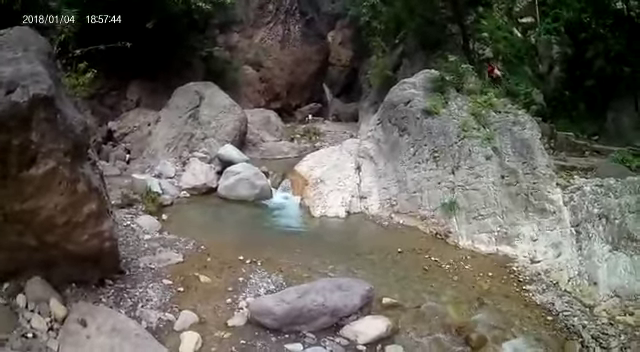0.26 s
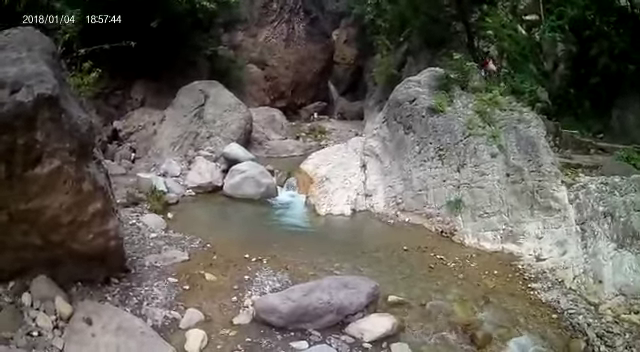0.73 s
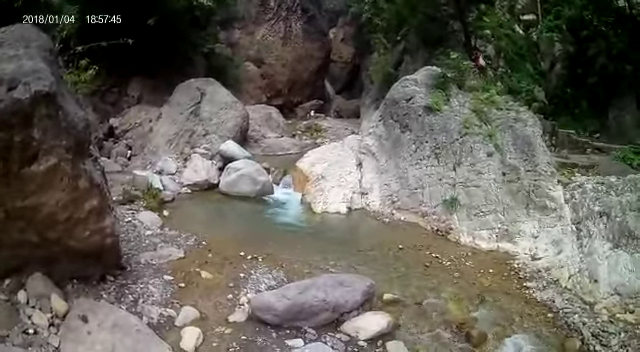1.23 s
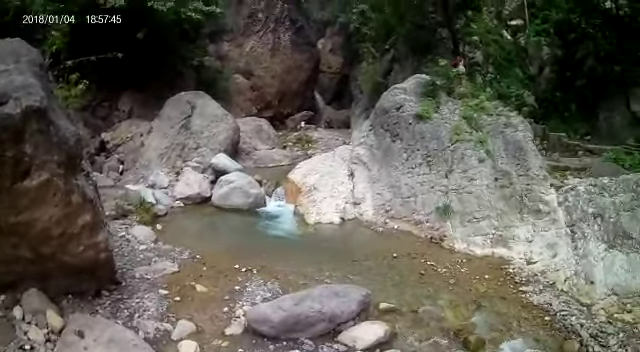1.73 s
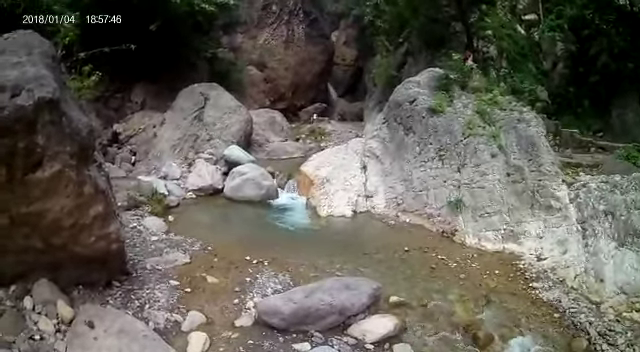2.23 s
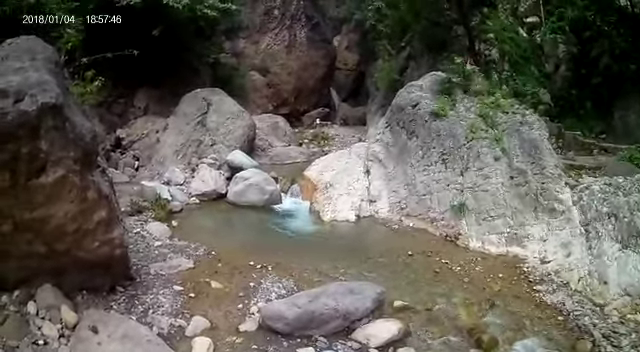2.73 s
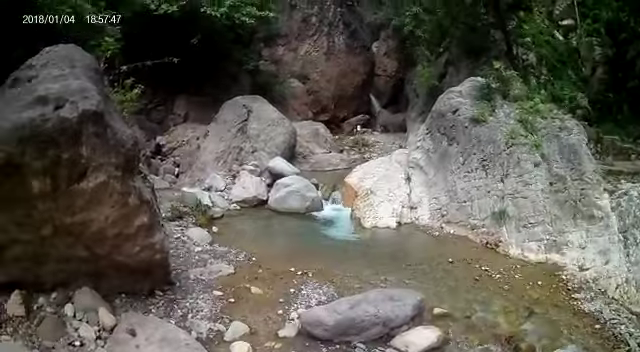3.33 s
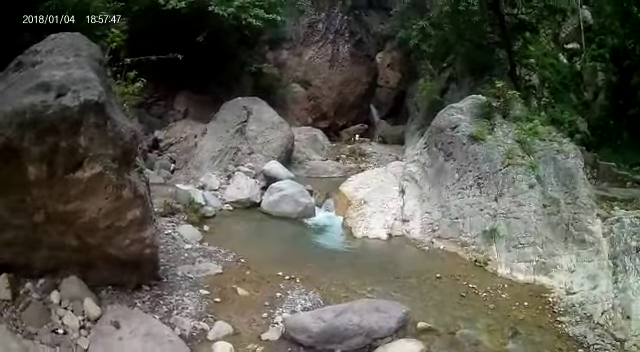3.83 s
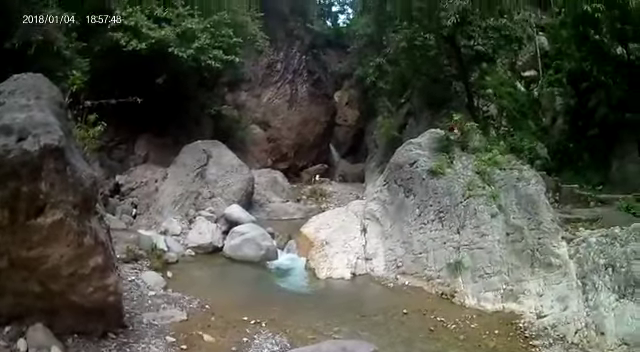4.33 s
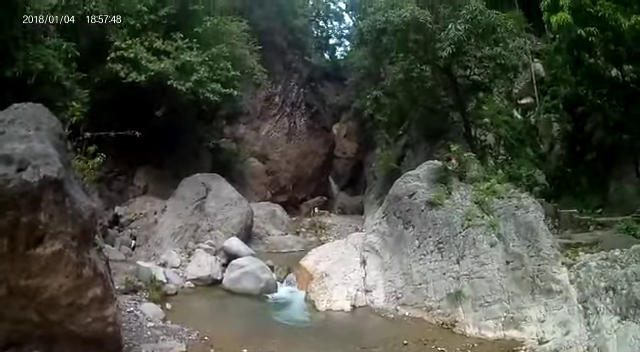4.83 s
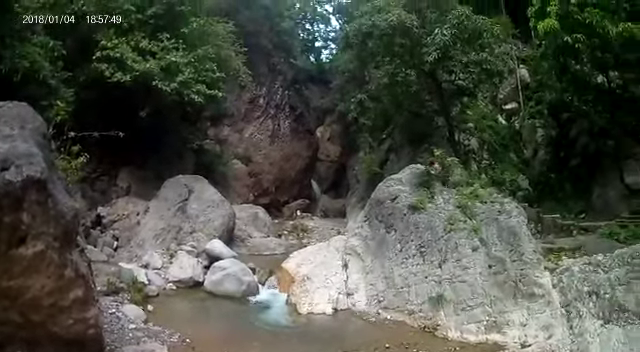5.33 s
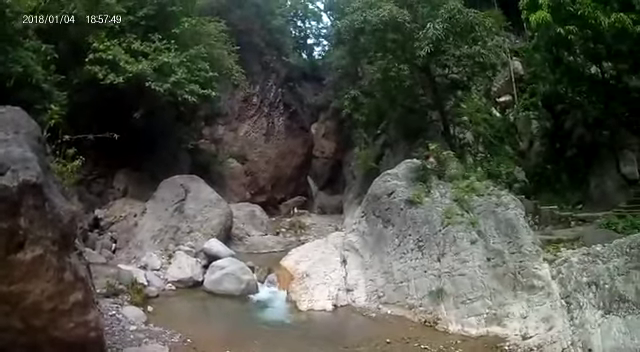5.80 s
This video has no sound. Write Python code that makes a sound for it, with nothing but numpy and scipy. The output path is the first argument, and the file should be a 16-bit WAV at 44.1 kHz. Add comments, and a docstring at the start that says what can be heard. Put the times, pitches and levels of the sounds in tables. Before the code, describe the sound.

A small waterfall pours into a rocky pool some metres away, a soft, steady rush lasting the whole six seconds, with occasional faint glugs, several around 3 seconds. Right at the microphone, a button on a plastic case snaps hard at the very start, followed by a faint tick. A light tick and two dull knocks from 1.6 seconds lead to a second snap at 2.1. More ticks and knocks from 3.7 seconds end in a third snap at 4.1. A tick at 5.3 and two knocks lead to the last snap at 5.7. The snaps are dry, far louder than the water, and slightly overload the microphone, each with a low thump and a brief ring. A faint spring twang comes just before the snaps, and a hand rumbles faintly on the case around each group of clicks.

```python
"""A small waterfall pours steadily into a rocky pool some metres away: a soft rush of turbulent noise
and bubbles, each a pocket of air oscillating against the water around it. Right at the microphone a
button on a plastic case clicks in groups: a light tick, dull knocks, then a hard snap that overloads
the input. Each impact excites the damped modes of the struck part and shoves the case. A spring
twangs before each snap, brief rings follow it, and the hand rumbles faintly as it shifts."""
import sys
import numpy as np
from scipy.fft import rfft, irfft, next_fast_len
from scipy.io import wavfile
from scipy.ndimage import map_coordinates

SR = 44100
rng = np.random.default_rng(int(sys.argv[2]) if len(sys.argv) > 2 else 0)


def master_out(mix):
    """Clip the mix to full scale and print it as 16-bit PCM to the path in sys.argv[1]."""
    frames = np.transpose(np.atleast_2d(mix))
    ceiling = np.clip(frames, -1, 1)
    pcm = np.round(ceiling * 32767).astype(np.int16)
    wavfile.write(sys.argv[1], SR, pcm)


N = 267187
FIRM_THUMP_DB = -25  # touches with a weaker thump than this bring less rumble and less fizz


def amp(db):
    """Amplitude ratio of a level in decibels."""
    return 10 ** (np.asarray(db) / 20)


def unit(x):
    """Normalisation to an rms of 1."""
    return x / np.sqrt(np.mean(x ** 2) + 1e-20)


def along(points, hz):
    """Interpolation of (frequency, value) points on a logarithmic frequency axis."""
    frequencies, values = np.transpose(points)
    return np.interp(np.log(hz + 1), np.log(frequencies + 1), values)


def wobble(rate):
    """Slow random modulation: a spline through `rate` random knots a second."""
    knots = rng.standard_normal(int(N * rate / SR) + 4)
    return map_coordinates(knots, [np.arange(N) * rate / SR])


def filtered(x, response):
    """Linear filtering: the spectrum of x times a frequency response."""
    size = next_fast_len(len(x) + SR // 4)
    return irfft(rfft(x, size) * response(np.fft.rfftfreq(size, 1 / SR)), size)[:len(x)]


def add(track, s, sound):
    """Superposition of a sound on the track from time s, which may be negative."""
    start = round(s * SR)
    sound = sound[max(-start, 0):]
    part = track[max(start, 0):][:len(sound)]
    part += sound[:len(part)]


def ring(hz, t60, t, phase=0):
    """Free vibration of a damped oscillator, falling 60 dB in t60 seconds."""
    return np.sin(2 * np.pi * hz * t + phase) * amp(-60 * t / t60)


def bubbles(count, centre_hz, spread_octaves, cycles, size_db, rise):
    """Bubble resonance: many small air pockets ring at random times, each briefly rising in pitch."""
    when, pitch, size = rng.random((count, 3)).T[:, :, None]
    hz = centre_hz * 2 ** (spread_octaves * (2 * pitch - 1))
    t = np.arange(SR // 30) / SR
    age = t * hz / cycles
    strength = amp(-size_db * np.log(size + .01))  # many faint bubbles, few loud ones
    envelope = strength * np.exp(-3 * age) * (1 - np.exp(-20 * age))
    phase = 2 * np.pi * hz * t * (1 + rise * np.minimum(age, 1))
    grains = envelope * np.sin(phase) * np.sqrt(hz)
    samples = (when * N).astype(int) + np.arange(len(t))
    return unit(np.bincount(samples.ravel(), grains.ravel(), N)[:N])


# Spectrum of falling water: (frequency [Hz], relative spectral density [dB])
WATER_SPECTRUM = [(15, -46), (25, -3), (65, -1.5), (163, -6), (364, -2), (774, -3), (1110, 0), (1240, 6),
                  (1410, 6.5), (2770, -17), (4190, -12), (5160, -22.5), (7050, -32), (8030, -35.5),
                  (11500, -35.5), (14300, -45.5), (16200, -61), (22000, -120)]
# Peaks and dips of the microphone's port: (frequency [Hz], width [Hz], gain [dB])
PORT_BANDS = [(1127, 32, 5), (1226.5, 69, -10.5), (1385, 140, -2.5), (2620, 630, -3), (3095, 120, 5),
              (4088, 110, 7), (4477, 94, 7)]


def waterfall():
    """Turbulence and bubbles give broadband noise; low churn and high spray waver independently."""
    cloud = bubbles(count=3000, centre_hz=865.6, spread_octaves=1.383, cycles=28, size_db=8, rise=0.043)
    water = rng.standard_normal(N) + amp(-20.5) * cloud
    port_db = lambda hz: sum(db * np.exp(-((hz - mid) / width) ** 2) for mid, width, db in PORT_BANDS)
    water = unit(filtered(water, lambda hz: amp(along(WATER_SPECTRUM, hz) + port_db(hz))))
    crossover_hz, churn_db, spray_db = 2460, -49, -61
    churn = filtered(water, lambda hz: 1 / (1 + (hz / crossover_hz) ** 6))
    spray = unit(water - churn)
    return churn * amp(churn_db + .5 * wobble(29)) + spray * amp(spray_db + .25 * wobble(57))


def grip():
    """Structure-borne noise: the hand shifts on the case as it works up to each tick and snap."""
    t = np.arange(N) / SR
    rumble_db, lead_s, half_width_s = -49, 0.033, 0.12
    shifts = [min(amp(thump_db - FIRM_THUMP_DB), 1) * np.exp(-((t - s + lead_s) / half_width_s) ** 2)
              for s, _, thump_db, *_ in [*TICK_IMPACTS, *SNAP_IMPACTS]]
    rumble = unit(filtered(rng.standard_normal(N), lambda hz: hz / (1 + (hz / 55) ** 3.8)))
    return amp(rumble_db) * np.max(shifts, axis=0) * rumble


# Rings after each snap, a low ping and a high ping or very brief bright edge:
# (time [s], high frequency [Hz], high level [dB], high t60 [s], low level [dB])
SNAP_RINGS = [(0.0276, 3526, -29, 0.075, -31.5), (2.061, 4700, -11, 0.013, -36),
              (4.139, 4730, -36, 0.01, -42), (5.712, 3535, -21.5, 0.08, -33.5)]


def twang_and_rings():
    """Damped oscillation: a spring twangs faintly before each snap; a low and a high ring follow it."""
    out, t = np.zeros(N), np.arange(SR // 4) / SR
    twang_db, lead_s, attack_s = -42, .064, 0.00091
    twang = amp(twang_db) * ring(hz=312, t60=.26, t=t) * (1 - np.exp(-t / attack_s))
    low_ping = ring(hz=1077, t60=.14, t=t)
    for s, high_hz, high_db, high_t60, low_db in SNAP_RINGS:
        flutter = amp(2.5 * wobble(140)[:len(t)])  # the high ring dies unevenly
        add(out, s - lead_s, twang)
        add(out, s, amp(low_db) * low_ping + amp(high_db) * flutter * ring(high_hz, high_t60, t))
    return out


def contact(hz, favoured_hz, tilt_db, cavity_db, rim_db, favour_db, octaves):
    """Excitation spectrum in dB: each blow has its own favoured band and brightness."""
    away = np.log2(np.maximum(hz, 350) / favoured_hz)
    band = favour_db * (np.exp(-(away / octaves) ** 2) - 1)
    cavity = cavity_db * np.exp(-((hz - 650) / 190) ** 2)  # the air inside the case
    rim = rim_db * np.exp(-((hz - 3800) / 1100) ** 2)  # the stiff rim of the button
    return band + tilt_db * away + cavity + rim


def thump(width_s, lean, t):
    """Elastic recoil about t = 0: the case gives and springs back; the microphone's bass cut rings on."""
    u = t / width_s
    corner_hz, damping = 46.5, 0.89
    bass_cut = lambda hz: -hz ** 2 / (corner_hz ** 2 - hz ** 2 + 1j * damping * corner_hz * hz)
    push = filtered((1 + lean * u) * np.exp(-u ** 2 / 2), bass_cut)
    return push / np.abs(push).max()


def impacts(rows, body, opposed, attack_s, favour_db, octaves, crack_db, rasp_db, lean, lag_s):
    """Impact excitation: each blow cracks, rings the modes and shoves the case; a faint rasp follows."""
    out, t = np.zeros(N), np.arange(SR // 12) / SR
    crack_t60, rasp_s, scatter_rad = 0.0021, .016, .2
    margin_s = .012  # room for the thump to build before its centre
    polarity = -1 if opposed else 1  # neighbouring modes start against each other, or all together
    for s, level_db, thump_db, thump_s, favoured_hz, tilt_db, cavity_db, rim_db, tuning in rows:
        colour = lambda hz: amp(contact(hz, favoured_hz, tilt_db, cavity_db, rim_db, favour_db, octaves))
        modes = np.zeros(len(t))
        for k, (mode_hz, db, t60) in enumerate(body):
            phase = rng.normal(0, scatter_rad)
            modes += polarity ** k * amp(db) * colour(mode_hz) * ring(mode_hz * tuning, t60, t, phase)
        noise = rng.standard_normal(len(t))
        grit = filtered(noise, lambda hz: colour(hz) * (hz > 350) / (1 + (hz / 9000) ** 2))
        crack = amp(crack_db - 60 * t / crack_t60)
        rasp = amp(rasp_db) * np.exp(-(t / rasp_s) ** 2)
        onset = 1 - np.exp(-(t / attack_s) ** 2)
        add(out, s, amp(level_db) * (modes + (crack + rasp) * grit) * onset)
        add(out, s + lag_s - margin_s, amp(thump_db) * thump(thump_s, lean, t - margin_s))
    return out


# Hard blows on the shell: (time [s], gain [dB], thump level [dB], thump width [s],
# favoured frequency [Hz], tilt [dB/octave], cavity gain [dB], rim gain [dB], mode tuning [ratio])
SNAP_IMPACTS = [(0.0265, 12, -3.5, 0.0011, 1870, -0.5, -7, 5, 0.997),
                (2.061, 7, -5.5, 0.0011, 2280, 1.2, 2, -0.5, 0.99),
                (4.138, 10, -3, 0.001, 1490, 1, -4, 2.5, 1.025),
                (5.711, 12.5, -4.5, 0.0012, 2450, 0.8, -6.5, 7.5, 0.99)]
# Modes of the plastic shell: (frequency [Hz], level [dB], t60 [s])
SHELL_MODES = [(470, 14, 0.0023), (658, -4.5, 0.032), (1000, 4.5, 0.0064), (1128, -9.5, 0.034),
               (1335, -1.5, 0.012), (1644, 7, 0.0054), (2039, -1.5, 0.012), (2214, -4.5, 0.013),
               (2711, 9.5, 0.0046), (3610, -13.5, 0.011), (3987, -15.5, 0.011), (4297, -11, 0.013),
               (5550, -20, 0.0098), (6200, -24, 0.0043)]


def snaps():
    """Modal vibration of the plastic shell under a hard snap of the button."""
    return impacts(SNAP_IMPACTS, SHELL_MODES, opposed=True, attack_s=0.0016, favour_db=8, octaves=0.32,
                   crack_db=-14.5, rasp_db=-28.5, lean=3.2, lag_s=0.0006)


# Narrow dips in the snaps: (frequency [Hz], width [Hz], gain [dB])
SNAP_NOTCHES = [(830, 80, -5), (1248, 36, -4.5), (1840, 41, -3.5)]


def notch_snaps(x):
    """Narrow bands between the snaps' resonances are swallowed."""
    def response(hz):
        notches = [1 - (1 - amp(db)) * 1j * hz * width / (mid ** 2 - hz ** 2 + 1j * hz * width)
                   for mid, width, db in SNAP_NOTCHES]
        return np.prod(notches, axis=0)
    return filtered(x, response)


# Light blows on the cap: (time [s], gain [dB], thump level [dB], thump width [s],
# favoured frequency [Hz], tilt [dB/octave], cavity gain [dB], rim gain [dB], mode tuning [ratio])
TICK_IMPACTS = [(0.1902, -28, -45.5, 0.0025, 2320, -4, -1, -9, 0.94),
                (1.106, -51, -44, 0.0025, 1500, -5, 2, -1, 0.75),
                (1.6326, -21, -28, 0.0032, 2080, -1.3, -5, -4, 0.99),
                (3.7461, -9, -18.5, 0.0018, 3820, -0.5, 6.5, 1, 1.02),
                (3.8677, -31.5, -56, .0022, 1710, -10.5, -4.5, -4, 0.98),
                (5.2595, -12, -20, .0023, 3250, -0.2, -1, 3, 1)]
# Modes of the small button cap: (frequency [Hz], level [dB], t60 [s])
CAP_MODES = [(564, -4.5, 0.008), (1115, -9.5, 0.021), (1365, -4, 0.02), (2074, -2.5, 0.011),
             (2283, -4, 0.016), (3946, 0.5, 0.0065), (5350, -11.5, 0.0094)]


def ticks():
    """Modal vibration of the button cap: a light touch starts its modes nearly in phase."""
    return impacts(TICK_IMPACTS, CAP_MODES, opposed=False, attack_s=0.00045, favour_db=6, octaves=0.81,
                   crack_db=-10, rasp_db=-20.5, lean=0.18, lag_s=0.00046)


def fizz():
    """Exponentially decaying treble noise tops each tick and knock; the softest have less."""
    out, t = np.zeros(N), np.arange(SR // 30) / SR
    fizz_db, t60, above_hz = -55, .045, 7500
    for s, _, thump_db, *_ in [*KNOCK_IMPACTS, *TICK_IMPACTS]:
        hiss = unit(filtered(rng.standard_normal(len(t)), lambda hz: hz > above_hz))
        level_db = fizz_db + min(thump_db - FIRM_THUMP_DB, 0)
        add(out, s, amp(level_db - 60 * t / t60) * hiss)
    return out


# Ringing blips, mostly large bubbles in the pool; those at 1.489 s and 5.31 s are soft touches on the case:
# (time [s], starting frequency [Hz], level [dB])
RINGING_BLIPS = [(1.489, 1330, -44), (1.779, 1533, -33.5), (2.8, 357, -44), (3.032, 984, -37.5),
                 (3.042, 1516, -37), (3.05, 1114, -43), (3.12, 460, -46), (3.365, 610, -40),
                 (3.483, 1600, -41), (3.899, 1415, -41), (4.892, 1380, -38.5), (4.929, 1100, -45),
                 (5.31, 606, -37)]


def glugs():
    """Bubble resonance: now and then a larger air pocket rings in the pool, rising slightly in pitch; two soft
    touches on the case ring the same way."""
    out, t = np.zeros(N), np.arange(SR // 8) / SR
    attack_s, t60 = .001, 0.052
    onset = 1 - np.exp(-t / attack_s)
    for s, hz, db in RINGING_BLIPS:
        add(out, s, amp(db) * ring(hz * (1 + 0.3 * t), t60, t) * onset)
    return out


# Dull blows on the wall: (time [s], gain [dB], thump level [dB], thump width [s],
# favoured frequency [Hz], tilt [dB/octave], cavity gain [dB], rim gain [dB], mode tuning [ratio])
KNOCK_IMPACTS = [(1.7304, -17.5, -27, 0.00066, 680, -3, 3.5, 2, 1.02),
                 (1.9646, -8, -16, 0.00037, 726, -10, -1, -2, 0.92),
                 (3.6875, -33.5, -30.5, 0.00098, 600, -7, 7, 4, 1.03),
                 (3.7846, -13.5, -21.5, 0.00046, 727, -5, -5, -3, 0.98),
                 (4.0126, -12.5, -20, 0.00054, 633, -10, 1, -3, 0.96),
                 (5.3306, -13.5, -19, 0.00044, 900, -5, -15, 1, 1.01),
                 (5.5888, -8.5, -21, 0.00048, 595, -12, -1.5, -2, 1.01)]
# Modes of the case wall under a fingertip: (frequency [Hz], level [dB], t60 [s])
WALL_MODES = [(480, 6, 0.0039), (633, -4.5, 0.023), (791, -1.5, 0.026), (1070, -5, 0.021),
              (1410, 1.5, 0.02), (1590, -3, 0.0025), (2370, 6.5, 0.0071), (4200, -4.5, 0.02)]


def knocks():
    """Damped modal vibration: the wall of the case, held by a fingertip, answers with a dull knock."""
    return impacts(KNOCK_IMPACTS, WALL_MODES, opposed=True, attack_s=0.00031, favour_db=13, octaves=0.29,
                   crack_db=8.5, rasp_db=-15, lean=0.37, lag_s=0.0014)


def scene():
    """Superposition of dry, very close clicks and distant water in one channel."""
    clicks = notch_snaps(snaps()) + ticks() + knocks() + fizz() + twang_and_rings()
    return (clicks + grip() + waterfall() + glugs())[None]


# Treble shelf of the input: (frequency [Hz], gain [dB])
TREBLE_SHELF = [(100, 0), (6900, 0), (7800, -8), (14000, -8)]


def record(dry):
    """Saturation rounds off the snaps; a shelf then softens the treble up to a steep band limit."""
    ceiling, limit_hz = .93, 14600
    saturated = dry[0] / (1 + np.abs(dry[0] / ceiling) ** 6) ** (1 / 6)
    soft = filtered(saturated, lambda hz: amp(along(TREBLE_SHELF, hz)))
    return filtered(soft, lambda hz: 1 / (1 + (hz / limit_hz) ** 80))[None]


dry = scene()
out = record(dry)
master_out(out)
```